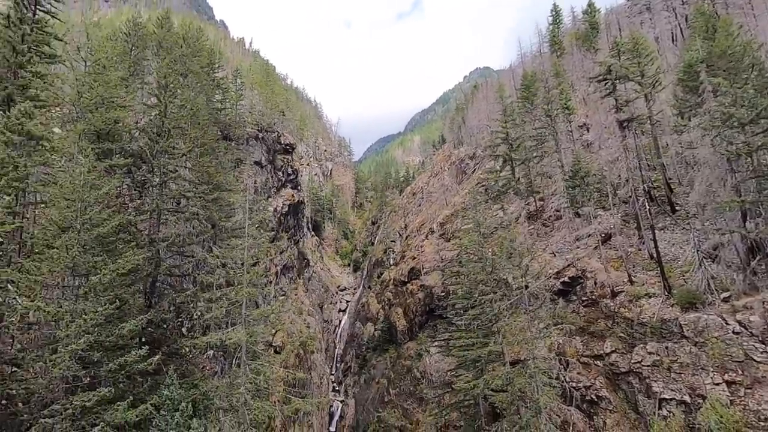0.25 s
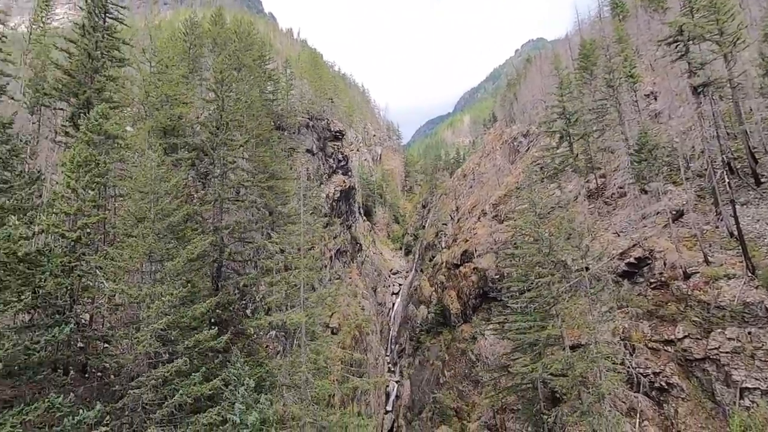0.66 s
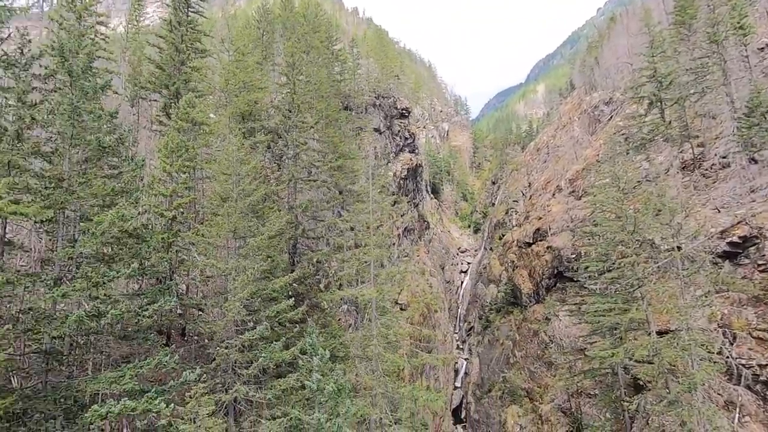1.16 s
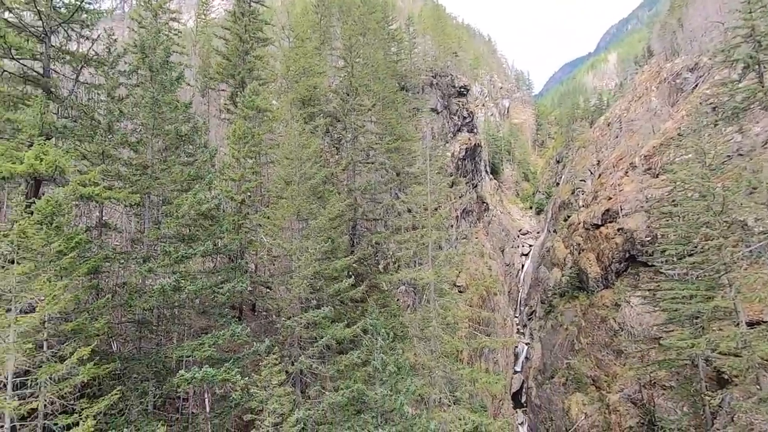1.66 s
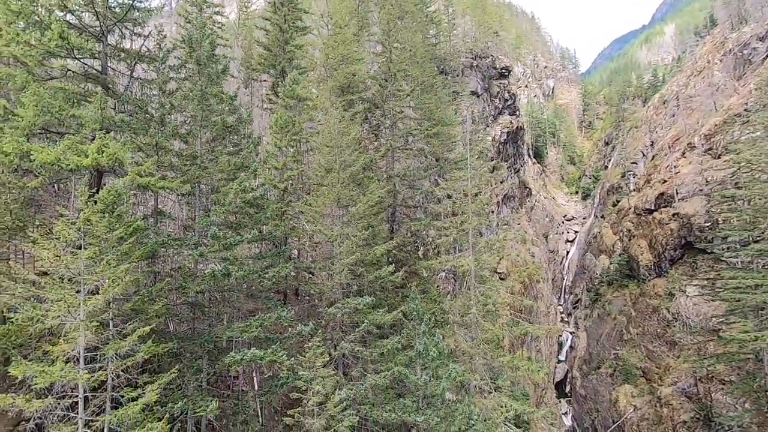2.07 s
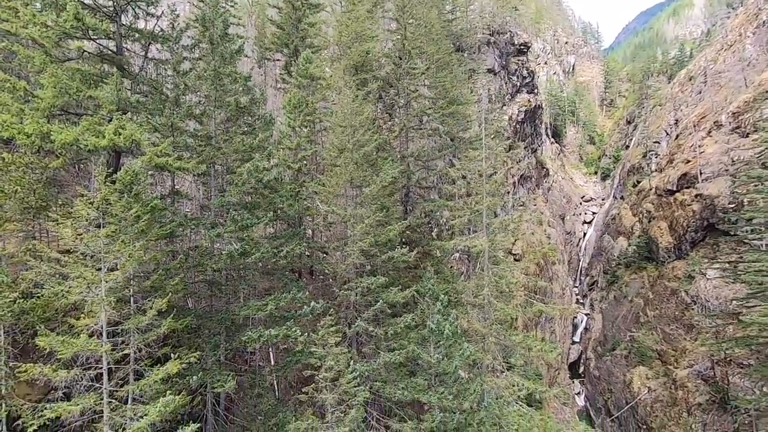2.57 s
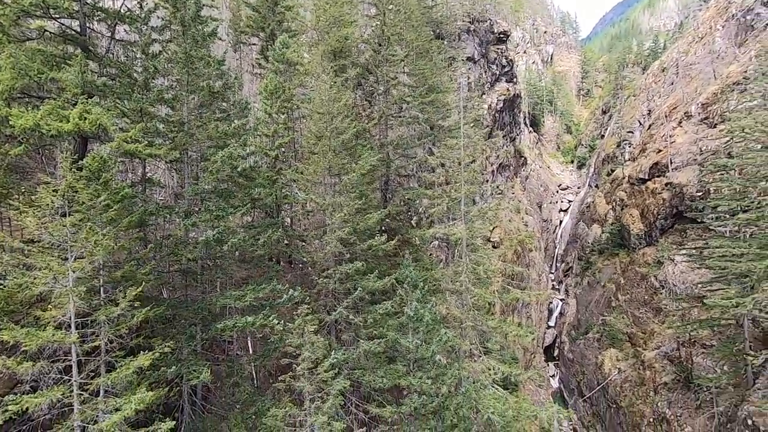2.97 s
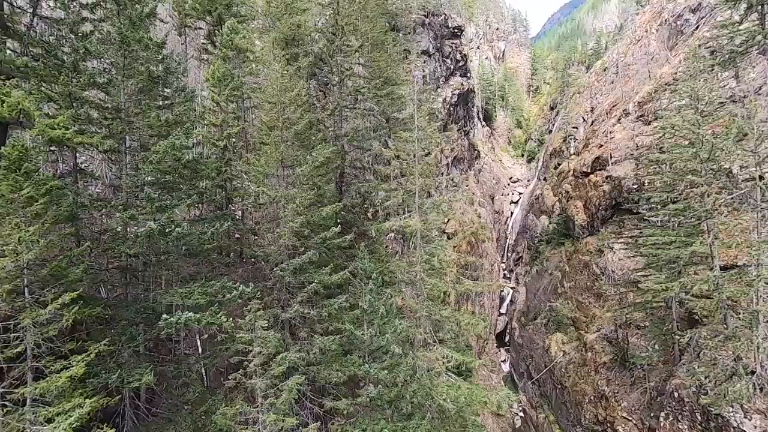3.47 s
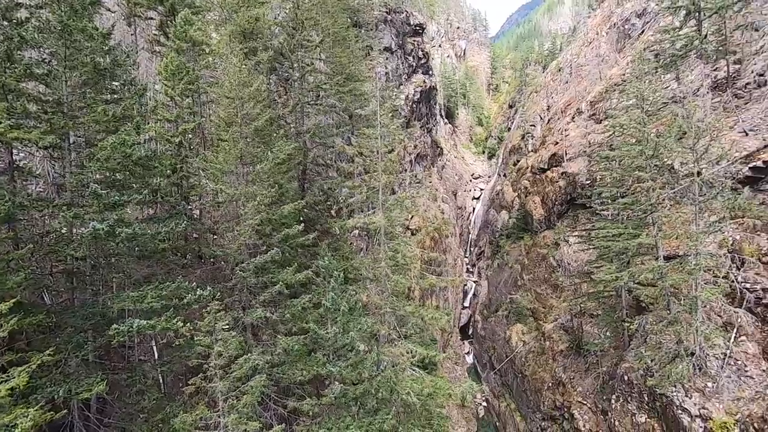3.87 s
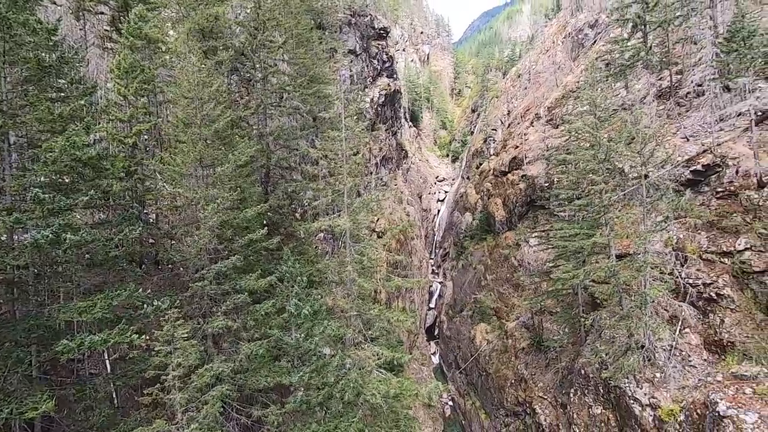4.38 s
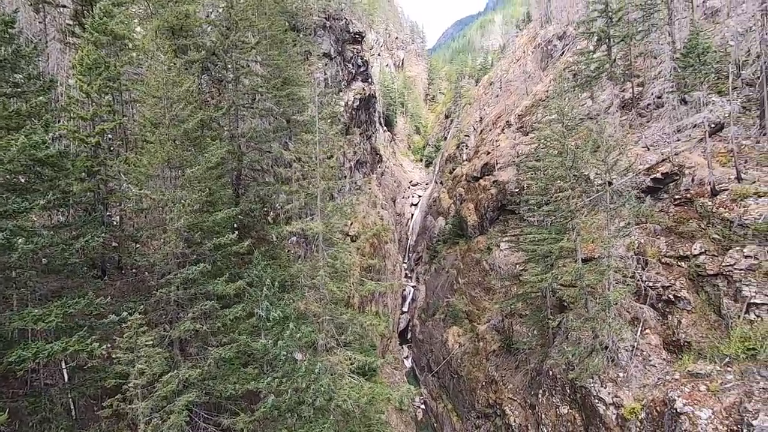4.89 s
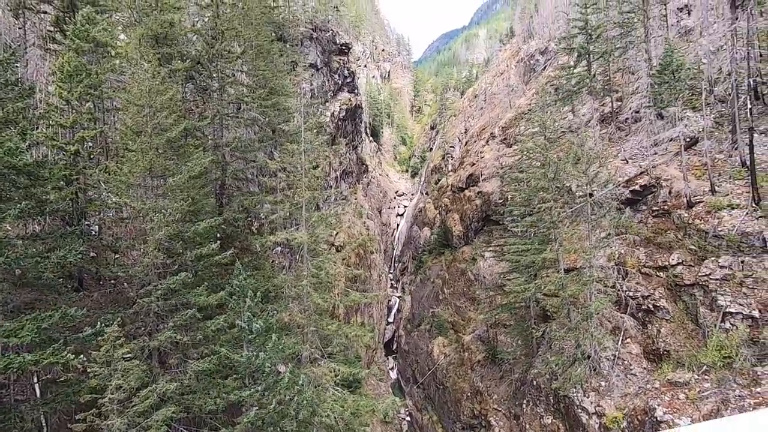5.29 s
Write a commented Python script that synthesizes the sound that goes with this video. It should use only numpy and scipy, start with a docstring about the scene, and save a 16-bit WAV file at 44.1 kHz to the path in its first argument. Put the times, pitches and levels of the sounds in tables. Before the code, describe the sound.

A distant waterfall in a forested rocky gorge makes one continuous, smooth, mid-heavy wash with soft, rolled-off highs, barely swelling and dulling. Close in front, wind hits an unshielded microphone in irregular deep thumps and low rumbles with faint flutter. Gusts are moderate at first, ease around one and a half seconds, then come harder and closer together, strongest between about three and four and a half seconds, before easing somewhat.

```python
"""Distant waterfall in a windy gorge

A distant waterfall roars down a rocky gorge as one smooth wash that the moving air swells and dulls:
noise shaped in time and frequency. Wind eddies roll over the bare microphone: slow pressure swings,
deep thumps, a rumble and a faint flutter in the gusts, each a band of noise with its own level curve."""
import sys
import numpy as np
from scipy import signal
from scipy.fft import rfft, irfft, next_fast_len
from scipy.io import wavfile
from scipy.ndimage import uniform_filter1d

SR = 44100
rng = np.random.default_rng(int(sys.argv[2]) if len(sys.argv) > 2 else 0)


def to_wav(s):
    """Save 16-bit WAV."""
    ch = np.atleast_2d(s).T  # columns
    pcm = np.round(np.clip(ch, -1, 1) * 32767)  # PCM
    wavfile.write(sys.argv[1], SR, pcm.astype(np.int16))


N = 244314  # length [samples]


def gain_of(db):
    """Amplitude factor of a level in dB."""
    return 10 ** (np.asarray(db) / 20)


def evened(x):
    """The signal scaled to an RMS of 1."""
    return x / np.sqrt(np.mean(x ** 2) + 1e-20)


def read(points, hz):
    """Spectrum level [dB], drawn straight over log frequency and all but silent outside the points."""
    point_hz, level_db = np.transpose(points)
    return np.interp(np.log(hz + 0.1), np.log(point_hz + 0.1), level_db, left=-120, right=-120)


def waterfall():
    """Countless splashes merge into noise; turbulent air on the long path makes patches of it drift."""
    # the wash as the air carries it: (time [s], roar level [dB], rush against roar [dB],
    # spray against roar [dB]); rush and spray act as departures from their own means
    falls = [(0.0, -47, -2, -5.5), (0.5, -48.5, -1.1, -7), (1.8, -47.5, -1.5, -6.5),
             (2.6, -47.8, -1.4, -7.5), (3.3, -47, -0.5, -6.5), (3.8, -46.5, -2, -7.5),
             (4.6, -47, -0.9, -6.5), (5.54, -48, -1.6, -6.5)]
    # long-term color of the wash: (frequency [Hz], relative level per Hz [dB])
    wash_spectrum = [(70, -36), (130, -7), (170, -1), (330, 0), (570, 0), (1000, -2.5), (1700, -5),
                     (3000, -9), (5000, -13.5), (6800, -16), (8500, -23), (11000, -32.5), (16200, -43.5)]
    frame, hop = 1024, 256  # [samples]
    hz = np.fft.rfftfreq(frame, 1 / SR)
    frames = N // hop + 5
    # four noise fields: frequency down, time across
    real, imag, small, wide = rng.standard_normal((frames, len(hz), 4)).T

    # patches are narrow in pitch and slower; surges span a wide band and pass quickly
    patches = uniform_filter1d(small, size=14, axis=0)
    patches = evened(uniform_filter1d(patches, size=16, axis=1))
    surges = uniform_filter1d(wide, size=90, axis=0)
    surges = evened(uniform_filter1d(surges, size=4, axis=1))

    s, roar_db, *above_db = np.transpose(falls)
    t = np.arange(frames) * hop / SR
    rush_db, spray_db = (np.interp(t, s, db) - np.mean(db) for db in above_db)
    # low bins follow the roar alone, higher ones pass over to the rush and then to the spray
    rush, spray = (np.clip(np.log2(hz / edge_hz + 1e-6) / 0.57, 0, 1)[:, None]
                   for edge_hz in (900, 3100))
    field_db = read(wash_spectrum, hz)[:, None] + (rush - spray) * rush_db + spray * spray_db
    field_db = field_db + 0.48 * patches + (0.2 + 0.34 * spray) * surges
    spectrogram = (real + 1j * imag) * gain_of(field_db)
    wash = signal.istft(spectrogram, nperseg=frame, noverlap=frame - hop)[1][:N]

    # the roar band sets the level of the whole wash
    roar_band = signal.butter(4, [250, 1200], "band", fs=SR, output="sos")
    roar = signal.sosfilt(roar_band, wash)
    return wash / np.std(roar) * gain_of(np.interp(np.arange(N) / SR, s, roar_db))


def gusting(over_db, share, lull_db):
    """Strength of one size of eddy: the lull plus, in power, a smooth bump for every gust."""
    # gusts that hit the microphone: (peak time [s], length [s], strength [dB], fineness [dB]);
    # each eddy size adds its own offset to the strength; high fineness flutters, low only thumps
    gusts = [(0.1, 0.24, -34.5, 2.5), (0.56, .16, -36, -1), (0.78, 0.18, -36.5, 4), (0.95, .1, -37, -8),
             (1.25, .12, -44, 6), (1.49, 0.13, -46.5, 18.5), (1.72, .16, -30.5, -13),
             (1.9, .14, -37.5, 2.5), (2.1, 0.22, -33, -3.5), (2.6, .2, -30.5, -6), (2.82, 0.17, -33, 4),
             (3.06, 0.21, -29.5, -0.5), (3.28, 0.18, -27, -2), (3.4, 0.14, -38, 13),
             (3.68, 0.22, -27.5, -1), (4.02, .2, -40, -10), (4.25, 0.23, -26, -5.5), (4.74, .16, -34, 5),
             (4.92, 0.23, -36, 2.5), (5.22, 0.18, -31.5, -1), (5.38, 0.13, -41, 12)]
    rise_share = 0.46  # part of a gust's length spent rising
    step = 100  # the curve is drawn at this spacing [samples]
    s, length, db, fine_db = np.transpose(gusts)[:, :, None]
    t = np.arange(0, N + step, step) / SR - s
    u = t / (length * np.where(t < 0, rise_share, 1 - rise_share))
    peak = gain_of(db + over_db + share * fine_db)
    bumps = peak ** 2 * np.exp(-2 * u ** 2)
    power = gain_of(lull_db) ** 2 + bumps.sum(0)
    return np.interp(np.arange(N) / step, np.arange(len(power)), np.sqrt(power))


def eddies(spectrum, steady):
    """Pressure of passing eddies of one size; steady 0-1 makes them alike in strength."""
    bins = N // 2 + 1
    noise = rng.standard_normal(bins) + 1j * rng.standard_normal(bins)
    shape = gain_of(read(spectrum, np.fft.rfftfreq(N, 1 / SR)))
    x = evened(irfft(noise * shape, N))
    envelope = abs(signal.hilbert(x, next_fast_len(N))[:N])
    x = x / (envelope + 0.11) ** np.clip(steady, 0, 1)
    # evening out the strength spreads the spectrum, so trim it back to the band
    return evened(irfft(rfft(x) * np.minimum(shape * 30, 1), N))


def wind():
    """Large eddies swell slowly at the microphone; the smaller sizes come with the gusts."""
    # slow pressure swings of the large eddies, smoothed below: (time [s], level [dB])
    swing_levels = [(0.0, -28), (0.27, -23.5), (0.4, -31), (0.6, -21.5), (0.85, -27), (1.25, -30.5),
                    (1.47, -25.5), (1.75, -31.5), (2.17, -22), (2.5, -33.5), (2.8, -23), (3.1, -23.5),
                    (3.5, -24.5), (3.7, -14), (3.9, -20.5), (4.12, -27.5), (4.35, -21.5), (4.55, -29),
                    (4.7, -24), (5.2, -23), (5.54, -32.5)]
    # color of each eddy size, large to small: (frequency [Hz], relative level per Hz [dB])
    swing_spectrum = [(.8, -49), (2, -3), (5, 2), (9, -4), (14, -9), (19, -36.5)]
    thump_spectrum = [(11, -35), (17, 4), (24, -7.5), (32, -11.5), (42, -58)]
    rumble_spectrum = [(24, -32), (33, 1.5), (45, -3), (62, -13), (80, -28)]
    flutter_spectrum = [(50, -20), (68, 1), (105, 3.5), (140, -2), (220, -22)]
    # thumps, rumble, flutter: (level against the gust [dB], share of the fineness [factor],
    # level in the lulls [dB], steadiness [0-1])
    sizes = [(-4, -0.33, -47, .95), (-12.5, .3, -59, .69), (-20.5, 0.92, -61.5, 0.8)]
    s, db = np.transpose(swing_levels)
    swing_db = uniform_filter1d(np.interp(np.arange(N) / SR, s, db), size=2000)
    swings = eddies(swing_spectrum, 0.94) * gain_of(swing_db)
    spectra = (thump_spectrum, rumble_spectrum, flutter_spectrum)
    buffeting = sum(eddies(spectrum, steady) * gusting(over_db, share, lull_db)
                    for spectrum, (over_db, share, lull_db, steady) in zip(spectra, sizes))
    return swings + buffeting


def scene():
    """Waterfall behind, wind on the microphone in front, as one channel."""
    return (waterfall() + wind())[None]


def record(dry):
    """The band limit: a steep low-pass takes off the top of the treble."""
    edge_hz = 15735
    # continue the sound past both ends so that the filter starts settled
    longer = np.pad(dry, [(0, 0), (1500, 1500)], "reflect", reflect_type="odd")
    low_pass = signal.firwin(3001, edge_hz, window=("kaiser", 9), fs=SR)
    return signal.oaconvolve(longer, low_pass[None], "valid")


dry = scene()
out = record(dry)
to_wav(out)
```